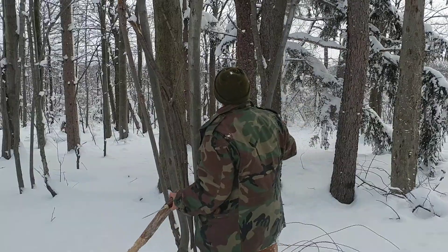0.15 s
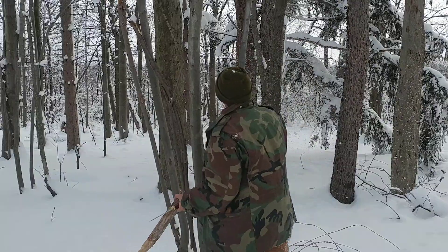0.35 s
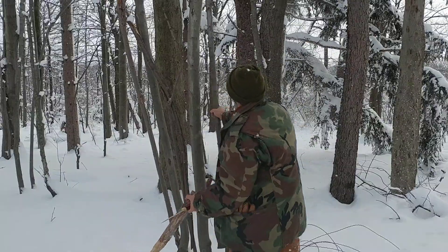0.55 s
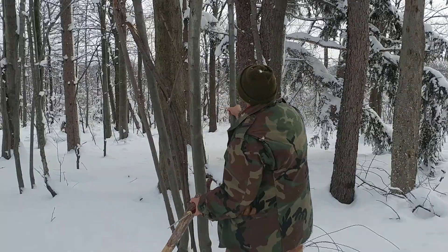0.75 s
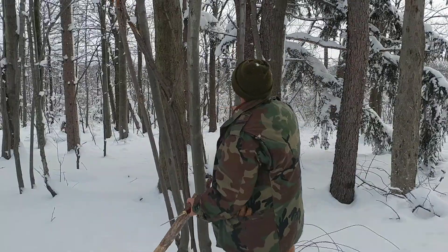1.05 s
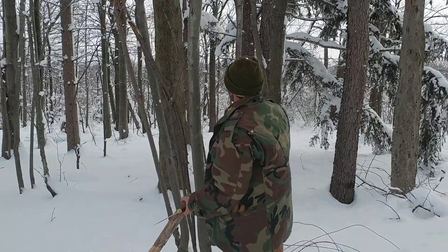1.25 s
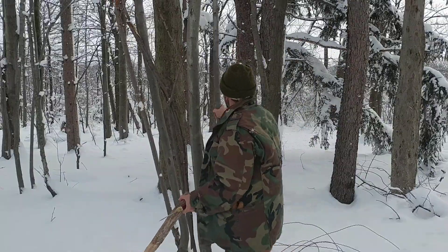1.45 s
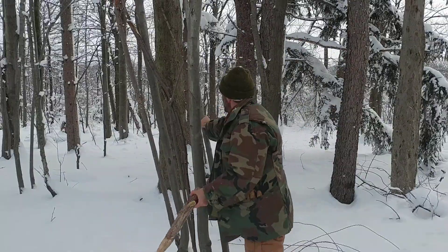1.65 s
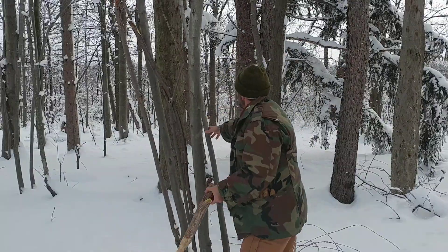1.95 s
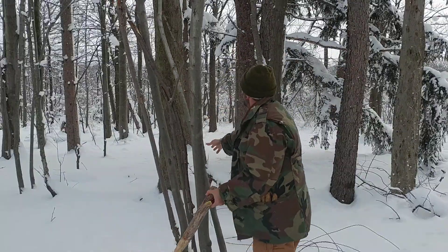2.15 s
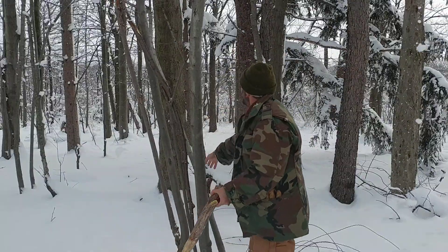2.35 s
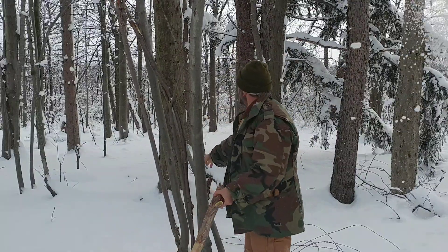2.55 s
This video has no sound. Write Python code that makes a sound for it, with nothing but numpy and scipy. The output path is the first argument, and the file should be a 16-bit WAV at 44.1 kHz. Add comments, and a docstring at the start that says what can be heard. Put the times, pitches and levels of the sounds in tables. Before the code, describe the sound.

Branches and twigs rustle, knock and snap as they are pushed aside in a snowy wood.

```python
"""A snowy wood, almost silent and dry; close to a stereo pair, saplings and dead branches are pushed aside.
Snow gives way underfoot with soft thuds. In each push bark grinds on bark, frozen twigs rustle and a
stiff sleeve swishes; twice a bent branch creaks. In front, sticks knock together with hollow clacks
and twigs snap, and the surrounding trunks scatter a little of both back to the microphones."""
import sys
import numpy as np
from scipy import signal
from scipy.fft import rfft, irfft, next_fast_len
from scipy.io import wavfile

SR = 44100
rng = np.random.default_rng(int(sys.argv[2]) if len(sys.argv) > 2 else 0)


def transcribe(signal):
    """Save signal, clipped to [-1, 1], as a 16-bit WAV file at the path in sys.argv[1]."""
    frames = np.atleast_2d(signal).T
    limited = np.clip(frames, -1, 1)
    pcm = np.round(limited * 32767).astype(np.int16)
    wavfile.write(sys.argv[1], SR, pcm)


N = 119070
TIME = np.arange(N) / SR
FFT_SIZE = next_fast_len(N + SR)
FFT_SIZE += FFT_SIZE % 2
HZ = np.maximum(np.arange(FFT_SIZE // 2 + 1) * SR / FFT_SIZE, 1)


def amp(db):
    """Decibels to gain."""
    return 10 ** (np.asarray(db) / 20)


def rms_one(x):
    """Scale to rms 1."""
    return x / np.sqrt(np.mean(x ** 2) + 1e-20)


def butter(x, order, hz, kind):
    """Butterworth filter."""
    return signal.sosfilt(signal.butter(order, hz, kind, fs=SR, output="sos"), x)


def over_hz(points):
    """Join (Hz, value) points on a log-frequency axis."""
    hz, value = np.transpose(points)
    return np.interp(np.log(HZ), np.log(hz), value)


def colour(x, points):
    """Causal (minimum-phase) filter that keeps the power of white noise."""
    cepstrum = irfft(np.log(rms_one(amp(over_hz(points)))))
    cepstrum[1:FFT_SIZE // 2] *= 2
    cepstrum[FFT_SIZE // 2 + 1:] = 0
    return irfft(rfft(x, FFT_SIZE) * np.exp(rfft(cepstrum)))[..., :N]


def place(x, balance, right_lag_s=.00007):
    """The sound reaches the left microphone first; each side shades it differently."""
    lean = amp(over_hz(balance) / 2)
    sides = np.array([lean, np.exp(-2j * np.pi * HZ * right_lag_s) / lean])
    return irfft(rfft(x, FFT_SIZE) * sides / np.sqrt((lean ** 2 + lean ** -2) / 2))[..., :N]


def noise(apart):
    """Stereo white noise; apart is the share that the two microphones do not have in common."""
    return np.sqrt(1 - apart) * rng.standard_normal(N) + np.sqrt(apart) * rng.standard_normal((2, N))


def clicks(start_s, gain):
    """One impulse per event."""
    return np.bincount(np.clip((start_s * SR).astype(int), 0, N - 1), gain, N)


def fade(x, decay_s):
    """Every impulse dies away exponentially."""
    return signal.lfilter([1], [1, -np.exp(-1 / (SR * decay_s))], x + 1e-18)


def ring(x, hz, t60):
    """A unit impulse sets a sine of height 1 ringing."""
    radius, angle = amp(-60 / (t60 * SR)), 2 * np.pi * hz / SR
    return signal.lfilter([0, np.sin(angle)], [1, -2 * radius * np.cos(angle), radius ** 2], x + 1e-18)


def wander(per_s):
    """Smooth random drift with a spread of about 1."""
    pole = np.exp(-2 * np.pi * per_s * 10 / SR)  # one step every 10 samples
    slow = signal.lfilter([1], [1, -2 * pole, pole ** 2], rng.standard_normal(N // 10 + 502))[500:]
    return np.interp(np.arange(N) / 10, np.arange(len(slow)), np.clip(rms_one(slow), -2.2, 2.2))


def grains(per_s, spread_db):
    """Tiny slips at random times; a few are stronger, or weaker if the spread is negative; rms 1."""
    sizes = amp(spread_db * np.minimum(rng.exponential(1, N), 4))
    return rms_one((rng.random(N) < per_s / SR) * sizes * rng.choice([-1, 1], N))


def crackle(share=.35):
    """Gain of a rustle in which twig tips and cloth folds catch and flick free at random; rms 1."""
    flicks = rms_one(fade(np.abs(grains(per_s=260, spread_db=2.2)), decay_s=.0016))
    return np.sqrt(1 - share + share * flicks ** 2)


def crunch(flutter_db, apart, flutter_per_s=83, clump_db=2):
    """Clumps of tiny slips: neighbouring bands flare up partly together, partly alone; rms 1."""
    edges_hz = np.geomspace(1300, 17000, 17)
    white = noise(apart), noise(apart)
    together, out = wander(flutter_per_s), 0
    for k, band in enumerate(zip(edges_hz, edges_hz[1:])):
        flare = amp(flutter_db * (together + wander(flutter_per_s)) / np.sqrt(2))
        out = out + flare * butter(white[k % 2], 2, band, "band")
    return rms_one(out * crackle() * amp(clump_db * wander(per_s=104)))


# The hush of the wood all round. Each row: frequency in Hz, relative level in dB.
FOREST_COLOUR = [(25, -25), (60, 6), (112, 0), (370, 1), (820, 5), (1900, -16), (7400, -10.5), (9000, -36),
                 (16000, -60)]


def forest():
    """The still wood: a faint, steady, mostly low noise."""
    return amp(-56) * colour(noise(apart=0.24), FOREST_COLOUR)


def trunks(x, level_db=-15.5, decay_s=0.037):
    """Weak, quickly dying scatter from the surrounding trees."""
    scatter = rms_one(noise(apart=1.0) * np.exp(-TIME / decay_s)) / np.sqrt(N)
    return amp(level_db) * signal.fftconvolve(x, scatter, axes=1)[:, :N]


# Snow giving way underfoot, centred between the microphones.
# Each row: start in seconds, relative level in dB, swell time in seconds, pitch in Hz.
THUDS = [(0.213, -44.5, 0.013, 276), (0.557, -44, 0.019, 168), (0.839, -31.5, 0.0028, 373),
         (1.014, -45.5, .012, 130), (1.764, -47, 0.0094, 150), (1.845, -59, 0.015, 110),
         (1.925, -46, 0.0093, 96), (2.048, -44.5, 0.017, 115), (2.218, -48, 0.012, 106),
         (2.386, -53.5, 0.031, 89)]
# The shuffle beneath the thuds. Each row: time in seconds, level in dB.
SHUFFLE_LEVELS = [(0.0, -70), (0.13, -57), (0.5, -52), (0.58, -46), (0.71, -49), (0.86, -46.5),
                  (0.92, -54.5), (1.56, -62), (1.85, -46), (2.7, -57.5)]
# Its dull tone. Each row: frequency in Hz, relative level in dB.
SHUFFLE_COLOUR = [(30, -33), (52, -6), (100, -3), (190, -4), (320, -12.5), (600, 0.5), (1500, -26.5)]


def snow(thud_trim_db=-0.5, band_ratio=1.63):
    """Weight shifts in deep snow: a dull shuffle with soft thuds that swell and die."""
    packing, thuds = noise(apart=.03), 0
    for start, db, swell_s, hz in THUDS:
        age = np.maximum(TIME - start, 0) / swell_s
        band = butter(packing, 2, [hz / band_ratio, hz * band_ratio], "band")
        thuds = thuds + amp(db + thud_trim_db) * age * np.exp(1 - age) * rms_one(band)
    shuffle_gain = amp(np.interp(TIME, *np.transpose(SHUFFLE_LEVELS)))
    return thuds + shuffle_gain * colour(noise(apart=0.022), SHUFFLE_COLOUR)


# Pushes through the brush near the microphones. Each row: start and end in seconds,
# then relative levels in dB of bark grind, twig rustle and sleeve swish.
PUSHES = [(0.077, 0.223, -49.5, -46.5, -48.5), (0.22, 0.293, -51, -46, -46), (0.35, 0.384, -46, -38.5, -65),
          (0.403, 0.496, -41.5, -40.5, -45), (0.494, 0.57, -38, -32.5, -39.5),
          (0.564, 0.65, -36, -38.5, -38), (0.662, 0.822, -38.5, -40, -46), (0.86, 0.896, -35.5, -48, -35),
          (0.917, 1.026, -44, -48, -37.5), (1.048, 1.191, -50, -51, -41.5),
          (1.244, 1.338, -49.5, -58.5, -49), (1.366, 1.396, -46, -56, -54),
          (1.432, 1.537, -51.5, -58.5, -44.5), (1.625, 1.864, -39.5, -47, -40.5),
          (1.805, 1.972, -41, -37.5, -37), (1.951, 2.008, -36.5, -35.5, -32),
          (2.027, 2.175, -43, -44.5, -35.5), (2.176, 2.23, -30.5, -33.5, -31),
          (2.242, 2.361, -39.5, -40, -34.5), (2.371, 2.454, -37, -46.5, -39),
          (2.457, 2.563, -43, -55.5, -51), (2.582, 2.681, -39.5, -53, -47.5)]


def pushes(attack_s=0.02, release_s=0.011, sag_db_per_s=15):
    """Gains of grind, rustle and swish: each push starts quickly, sags and lets go."""
    power = np.zeros((3, N))
    for start, end, *db in PUSHES:
        attack = np.clip((TIME - start) / attack_s + .5, 0, 1)
        sag = amp(-sag_db_per_s * (np.clip(TIME, start, end) - (start + end) / 2))
        release = np.exp(-np.maximum(TIME - end, 0) / release_s)
        power += np.outer(amp(db), attack * sag * release) ** 2
    return np.sqrt(power)


# The sleeve's high hiss. Each row: frequency in Hz, relative level in dB.
SWISH_COLOUR = [(3000, -15), (6000, -4), (7500, 0.5), (8900, -10), (10200, 5), (12500, -5), (15500, -8)]
# It sits well to the left. Each row: frequency in Hz, left microphone over right in dB.
SWISH_BALANCE = [(6000, 5.6), (10000, 16)]


def swish(push, trim_db=-1.5, rest_db=-57.5):
    """Stiff cloth and icy snow slide over the twigs."""
    gain = np.hypot(push * amp(trim_db), amp(rest_db))
    return place(colour(gain * crunch(flutter_db=4.5, apart=1.0), SWISH_COLOUR), SWISH_BALANCE)


# The bright rustle of twigs. Each row: frequency in Hz, relative level in dB.
RUSTLE_COLOUR = [(1200, -17), (2000, -3), (2800, -2), (4000, -7), (5300, -5.5), (7200, 4.5), (8100, 0),
                 (8900, -27.5), (10500, -10), (15000, -21)]
# It spreads evenly across the pair. Each row: frequency in Hz, left over right in dB.
RUSTLE_BALANCE = [(2000, 0.5), (5500, -0.5), (9000, 1)]


def rustle(push, trim_db=2, rest_db=-58.5):
    """Frozen twigs brush past each other."""
    gain = np.hypot(push * amp(trim_db), amp(rest_db))
    return place(colour(gain * crunch(flutter_db=3.5, apart=0.91), RUSTLE_COLOUR), RUSTLE_BALANCE)


# The tone of dry wood, rubbed or struck. Each row: frequency in Hz, relative level in dB.
WOOD_COLOUR = [(200, -40), (420, -10.5), (570, -2), (850, 2.5), (1300, 1.5), (1550, -0.5), (1800, -11),
               (2600, -9), (4000, -11.5), (8000, -73)]
# The wood sits a little to the right. Each row: frequency in Hz, left over right in dB.
WOOD_BALANCE = [(500, -2), (750, 0), (1250, -6), (2000, 1.5)]


def grind(push, trim_db=-2.5, rest_db=-63.5, hiss_db=1):
    """Bark catches and slips on bark, sounding the wood."""
    texture = rms_one(grains(per_s=540, spread_db=-1.5) + amp(hiss_db) * noise(apart=0.21))
    gain = np.hypot(push * amp(trim_db), amp(rest_db))
    return place(colour(gain * texture, WOOD_COLOUR), WOOD_BALANCE)


# A bent branch rasps on its neighbour. Each row: start and end in seconds, level in dB, pitch in Hz.
CREAKS = [(0.338, 0.39, -37.5, 889), (1.835, 1.906, -29, 1379)]
# Its resonances. Each row: ratio to the pitch, relative level in dB, seconds to fall by 60 dB.
CREAK_MODES = [(.69, -8, 0.098), (.87, 1, 0.071), (1.002, 8.5, 0.1)]


def creak():
    """Uneven stick-slip pulses ring a bent branch."""
    slips, out = grains(per_s=260, spread_db=3.0), 0
    for start, end, db, hz in CREAKS:
        drive = np.array([slips, slips * (TIME > start) * (TIME < end)])
        modes = [amp(mode_db) * ring(drive, ratio * hz, t60) for ratio, mode_db, t60 in CREAK_MODES]
        steady, burst = sum(modes)
        out = out + amp(db) * burst / steady.std()  # unbroken creaking sets the scale
    return place(out, WOOD_BALANCE)


# The hollow tone of one stick. Each row: ratio to its pitch, relative level in dB.
CLACK_COLOUR = [(.15, -48.5), (.4, -7), (.68, -3.5), (1, 19.5), (1.24, 14.5), (1.55, -15.5), (2.6, -6.5),
                (6, -87)]


def clack(pitch_hz):
    """The short, broad sound of one stick struck; peak 1."""
    shape = colour(np.ones(1), [(ratio * pitch_hz, db) for ratio, db in CLACK_COLOUR])
    return shape / np.abs(shape).max()


# Stick on stick, close by. Each row: start in seconds, relative level in dB, pitch in Hz.
KNOCKS = [(0.087, -27, 900), (0.375, -32.5, 830), (0.4305, -20.5, 1230), (0.563, -21, 860),
          (0.663, -10.5, 1110), (0.726, -23, 1290), (0.762, -24, 1320), (0.872, -28, 1360),
          (1.159, -23, 1326), (1.249, -32, 1020), (1.348, -30.5, 940), (1.433, -35.5, 1170),
          (1.499, -33.5, 840), (1.639, -28, 1360), (1.767, -29, 850), (1.823, -23.5, 1350),
          (1.846, -38, 825), (1.881, -15.5, 1300), (1.901, -20, 1220), (1.967, -22.5, 1200),
          (2.189, -16.5, 1130), (2.205, -20.5, 1340), (2.29, -28.5, 900), (2.392, -23, 1040),
          (2.399, -19.5, 990), (2.406, -24.5, 1340), (2.493, -40, 1000), (2.589, -29.5, 860)]
# The sticks' ring. Each row: frequency in Hz, mean level against the blow in dB, seconds to fall 60 dB.
STICK_MODES = [(564, -29, 0.18), (808, -20, 0.16), (882, -25.5, 0.084), (905, -14, 0.02), (1183, -14, 0.09),
               (1390, -19, 0.023), (1495, -27, 0.075)]


def knocks(blow_db=-3, note_db=-9.5, note_t60_s=.03, chatter_db=-6, crack_db=17, crack_growth=0.71):
    """Struck sticks clack and ring while their neighbours chatter briefly; hard blows also crack."""
    starts, db, _ = np.transpose(KNOCKS)
    sticks = np.zeros(N)
    for start, knock_db, hz in KNOCKS:
        i = int(start * SR)
        note = amp(note_db - 60 * TIME / note_t60_s) * np.sin(2 * np.pi * hz * TIME)
        sticks[i:] += amp(knock_db) * (amp(blow_db) * clack(hz) + note)[:N - i]
    for hz, mode_db, t60 in STICK_MODES:
        strength = amp(db + mode_db + rng.normal(0, 3.5, len(db))) * rng.choice([-1, 1], len(db))
        sticks += ring(clicks(starts, strength), hz, t60)
    splits = clicks(starts, amp(db + crack_db + crack_growth * db))  # growth: extra dB per dB of blow
    crack = butter(fade(splits, decay_s=0.0047) * rng.standard_normal(N), 3, (2250, 2950), "band")
    blows = clicks(starts, amp(db + blow_db))
    chatter = colour(fade(blows, decay_s=.011) * noise(apart=0.041), WOOD_COLOUR)
    return place(sticks + crack + amp(chatter_db) * chatter, WOOD_BALANCE)


# Twigs breaking right by the microphones. Each row: start in seconds, relative level in dB,
# lean to the left in dB, lift of highs over lows in dB.
SNAPS = [(0.185, -27, 6.5, 3), (0.226, -34, 27, -17), (0.4185, -27, 17, -20), (0.4278, -28, 9, -29),
         (0.4321, -13, 2, -20.5), (0.4948, -18, -11, 6), (0.5042, -12, 10.5, 0.5), (0.5195, -21.5, 7, 0),
         (0.6643, -19.5, 5, -7), (0.6866, -15.5, 8.5, -6), (0.7051, -24, 4, 14), (0.7282, -16.5, 7, -4),
         (0.7561, -14, 9.5, -5), (0.7802, -18, 4, 14), (0.7832, -14, 3, 5), (0.9344, -27.5, 7, 16),
         (1.4908, -25.5, 4.5, 15.5), (1.705, -20.5, 1, 17), (1.7244, -18.5, 7, -8),
         (1.8465, -17.5, 10.5, 0), (1.851, -12.5, 5, -2), (1.9258, -19, 5, 14), (1.938, -20.5, 6, 11),
         (1.9662, -14, -0.5, -8), (2.055, -23, 1, 14), (2.063, -15, 2, 15.5), (2.175, -14, -3, 3),
         (2.1837, -20.5, 2, 10), (2.2115, -14, -8, -7), (2.3904, -11.5, 8, -11), (2.3972, -1.5, -0.5, -1),
         (2.4175, -25, 4, -8), (2.6125, -30.5, -5, -19), (2.634, -33, -8, -16), (2.6479, -25.5, 0, -19)]
# The sharp tone they share. Each row: frequency in Hz, relative level in dB.
SNAP_COLOUR = [(150, -89), (1000, -11.5), (2800, -10), (4100, -4), (5200, -4.5), (6900, 6.5), (8900, -3),
               (10600, 2), (13000, -4), (16000, -14)]
# A further lean, lows right and highs left. Each row: frequency in Hz, left over right in dB.
SNAP_BALANCE = [(4000, -4.5), (6000, -4), (9000, 8.5), (15000, 12)]


def snaps(trim_db=-0.5, crack_db=5, tear_s=.001, splinter_db=-26, splinter_s=0.036, split_hz=7150):
    """A crack, fibres tearing for a millisecond or two, then splinters; thin twigs are brighter."""
    starts, db, pan_db, bright_db = np.transpose(SNAPS)
    tearing, out = noise(apart=.45), 0
    for kind, tilt_db in (("low", -bright_db / 2), ("high", bright_db / 2)):
        band_db = db + trim_db + tilt_db
        breaks = np.array([clicks(starts, amp(band_db + side * pan_db / 2)) for side in (1, -1)])
        envelope = fade(breaks, tear_s) + amp(splinter_db) * fade(breaks, splinter_s)
        out = out + butter(amp(crack_db) * breaks + envelope * tearing, 3, split_hz, kind)
    return place(colour(out, SNAP_COLOUR), SNAP_BALANCE)


def scene():
    """At the microphones: the still forest, the brush, the snow underfoot and the sharp hits."""
    bark, twigs, sleeve = pushes()
    hits = knocks() + snaps()
    background = forest() + trunks(hits)
    brush = grind(bark) + creak() + rustle(twigs) + swish(sleeve)
    return background + brush + snow() + hits


def record(dry, low_cut_hz=30, top_hz=15900):
    """The recorder filters out rumble, clips any peak over full scale and cuts the top steeply."""
    clipped = np.clip(butter(dry, 4, low_cut_hz, "high"), -1, 1)
    return irfft(rfft(clipped, FFT_SIZE) / np.sqrt(1 + (HZ / top_hz) ** 160))[:, :N]


dry = scene()
out = record(dry)
transcribe(out)
```